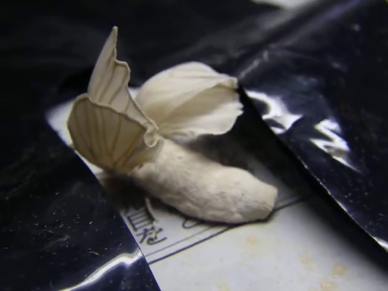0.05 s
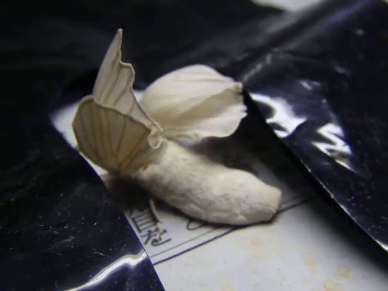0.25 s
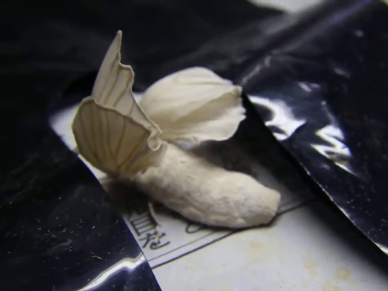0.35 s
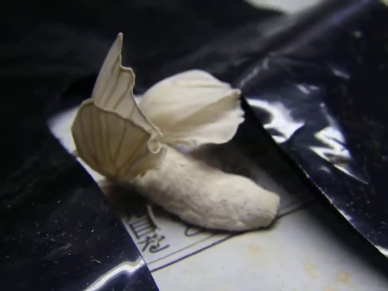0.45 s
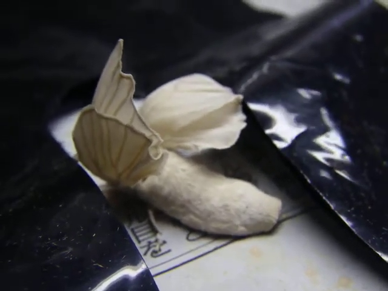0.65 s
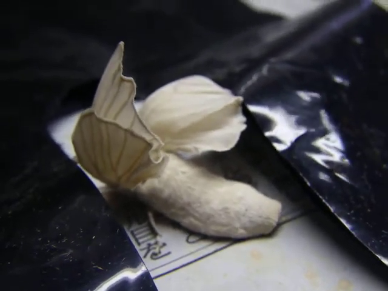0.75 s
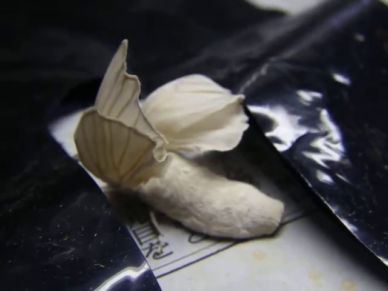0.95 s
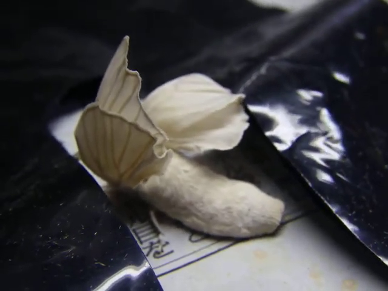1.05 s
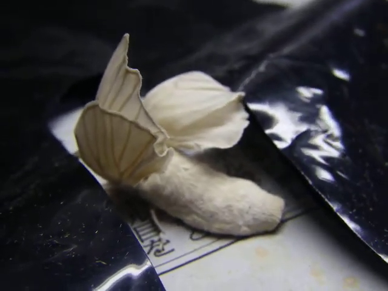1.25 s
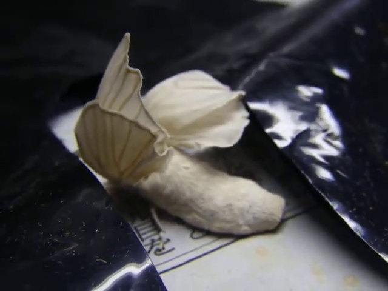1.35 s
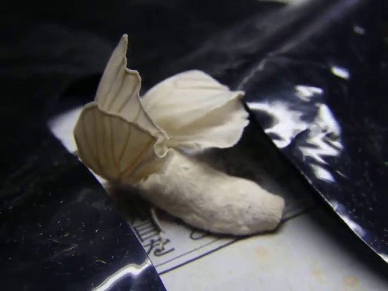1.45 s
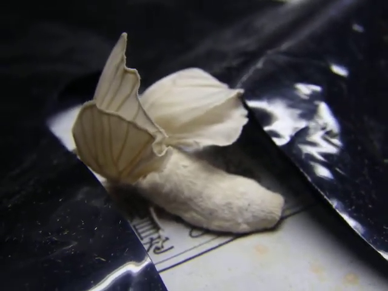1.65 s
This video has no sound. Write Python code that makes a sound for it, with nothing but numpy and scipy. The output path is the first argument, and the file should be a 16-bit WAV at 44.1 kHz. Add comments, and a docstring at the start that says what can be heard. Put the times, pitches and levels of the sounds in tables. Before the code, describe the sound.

A moth tapping lightly on plastic, with one sharp snap, over quiet room noise.

```python
"""Moth on a plastic sheet

A moth shifts about on a sheet of plastic in a quiet room, very near the microphone.
The plastic gives one sharp snap; light taps follow, mostly in pairs, each a tiny tick and a hollow
knock. Every contact excites damped modes of the sheet. The recorder's gain dips after the snap
and lets the room noise swell back."""
import sys
import numpy as np
from scipy import signal
from scipy.fft import rfft, irfft
from scipy.io import wavfile
from scipy.ndimage import uniform_filter1d

SR = 44100
rng = np.random.default_rng(int(sys.argv[2]) if len(sys.argv) > 2 else 0)


def waveform_to_disk(signal):
    """Save audio, clipped to [-1, 1], as 16-bit WAV at the path in sys.argv[1]."""
    frames = np.transpose(np.atleast_2d(signal))
    scaled = np.clip(frames, -1, 1) * 32767
    samples = np.round(scaled).astype(np.int16)
    wavfile.write(sys.argv[1], SR, samples)


N = 74970


def amp(db):
    """Amplitude ratio: a factor of ten for every 20 dB."""
    return 10 ** (np.asarray(db) / 20)


def unit(x):
    """Normalisation to an RMS value of one."""
    return x / np.sqrt(np.mean(x ** 2) + 1e-20)


def add(mix, start_s, sound):
    """Superposition: a sound adds linearly to the mix from its onset."""
    part = mix[round(start_s * SR):][:len(sound)]
    part += sound[:len(part)]


def cut(x, hz, kind, order=2):
    """Butterworth low-pass or high-pass, sloping 6 dB per octave for each order."""
    return signal.sosfilt(signal.butter(order, hz, kind, fs=SR, output="sos"), x)


def ages():
    """Time axis of a transient, in seconds since the contact."""
    return np.arange(4096) / SR


def mode(hz, db, swell, t60, lag=1, bend=0, bend_s=0.0023):
    """Damped oscillator: it swells (later as lag grows), then decays by 60 dB in t60 seconds."""
    t = ages()
    rise = np.sin(np.pi / 2 * np.minimum(t / swell, 1) ** lag) ** 2
    decay = amp(db - 60 * np.maximum(t - swell, 0) / t60)
    cycles = hz * (t - bend * bend_s * (1 - np.exp(-t / bend_s)))  # starts flat by the fraction bend
    return rise * decay * np.sin(2 * np.pi * cycles)


def burst(db, t60):
    """Broadband transient: white noise under an exponential decay."""
    t = ages()
    return amp(db - 60 * t / t60) * rng.standard_normal(len(t))


def room_noise(level_db=-45.5, patchy_db=1.5):
    """Random-phase noise: room sound and microphone hiss, with a slightly fluctuating spectrum."""
    # Spectral density of the background: f/Hz, relative level/dB
    spectrum = [(20, -6.5), (55, -10.5), (100, -8.5), (150, -2), (240, -3.5), (310, -1), (440, -4.5),
                (520, -5), (620, -6.5), (760, -14.5), (930, -5.5), (1170, -16), (1390, -12.5), (1620, -21),
                (2250, -22.5), (2750, -25.5), (5600, -27), (7700, -30), (13700, -31), (15800, -36.5)]
    corner_hz, corner_db = np.transpose(spectrum)
    hz = np.fft.rfftfreq(2048, 1 / SR)
    density_db = np.interp(np.log(hz + 1), np.log(corner_hz + 1), corner_db)
    real, imag, patches = rng.standard_normal((3, N // 512 + 5, len(hz)))
    patches = uniform_filter1d(patches, size=6, axis=0)  # smooth in time
    patches = unit(uniform_filter1d(patches, size=14, axis=1))  # and in frequency
    frames = (real + 1j * imag) * amp(density_db + patchy_db * patches)
    _, noise = signal.istft(frames.T, nperseg=2048, noverlap=1536)
    return amp(level_db) * unit(noise[:N])


def room_resonances():
    """Resonance: narrow bands of noise give the background a hollow colour."""
    # Peaks in the room noise: f/Hz, bandwidth/Hz, level/dB
    peaks = [(415.4, 28, -54), (976.6, 94, -57.5)]
    hz = np.fft.rfftfreq(N, 1 / SR)
    hollow = np.zeros(N)
    for centre_hz, width_hz, db in peaks:
        response = 1 / (1 + (2 * (hz - centre_hz) / width_hz) ** 2)
        hollow += amp(db) * unit(irfft(rfft(rng.standard_normal(N)) * response, N))
    return hollow


def rumble(top_hz=83.3):
    """Amplitude modulation: low-frequency noise swells and sinks unevenly."""
    # Envelope of the rumble: t/s, level/dB
    envelope = [(0, -58), (.07, -45.5), (.14, -53), (.19, -61), (.56, -52), (.68, -63), (.87, -47),
                (.95, -58), (1.3, -71), (1.44, -46.5), (1.52, -61), (1.7, -56)]
    noise = unit(cut(rng.standard_normal(N), top_hz, "low", order=4))
    return noise * amp(np.interp(np.arange(N) / SR, *np.transpose(envelope)))


def tap(knock_db, thump_db, tick_db, tilt_db, pitch, slowness):
    """Impact excitation: a light contact gives a gritty tick, then the sheet knocks and thumps."""
    # Nominal modes of the sheet: f/Hz, relative level/dB, swell/s, T60/s
    knock_modes = [(565, -22, .002, 0.04), (1083, 0.5, .0036, 0.022)]  # hollow ring that builds up after the contact
    thump_modes = [(62.3, -9, 0.0048, 0.08), (318.7, 0, 0.0066, 0.055)]  # slower sway of the whole sheet
    tick_modes = [(1325, -15, 0.00038, 0.019), (1965, -8.5, 0.00047, 0.015), (2875, -10.5, 0.00025, 0.011),
                  (3660, -10.5, 0.00039, 0.013), (4350, -10, 0.00015, 0.011), (5130, -7, 0.00028, 0.014),
                  (5650, -10.5, 0.00046, 0.013), (6800, -9.5, .0002, 0.0045), (7790, -6.5, 0.00029, 0.0057),
                  (9500, -14.5, 0.00017, .004)]  # bright ring of the contact itself
    knock = sum(mode(hz * pitch, db, swell * slowness, t60, bend=0.32)
                for hz, db, swell, t60 in knock_modes)
    thump = sum(mode(*row) for row in thump_modes)
    tick = 0
    for k, (hz, db, swell, t60) in enumerate(tick_modes):
        detune, scatter_db = rng.normal(0, [0.022, 1])  # no two contacts are alike
        mode_db = db + scatter_db + tilt_db * np.log2(hz / 4000)
        tick += (-1) ** k * mode(hz * (1 + detune), mode_db, swell, t60)
    grit = cut(burst(db=-6.5 + tilt_db / 2, t60=0.011), 9100, "low", order=4)
    return amp(knock_db) * knock + amp(thump_db) * thump + amp(tick_db) * (tick + grit)


def snap(gain_db=-2, push_s=0.0026):
    """Impulse response: the plastic cracks, shoves the air and rings; two close modes beat."""
    # Modes rung by the snap: f/Hz, relative level/dB, swell/s, T60/s
    ring_modes = [(85, -25, 0.0038, 0.024), (858, -31.5, 0.0013, 0.044), (1125, -14, .0028, .021),
                  (1570, -24, 0.0014, 0.025), (2000, -16.5, 0.00025, 0.021), (2230, -17.5, 0.000083, 0.015),
                  (2390, -15.5, 0.00033, 0.0085), (2810, -24.5, 0.00021, 0.017),
                  (3570, -21.5, 0.000075, 0.016), (4290, -12.5, 0.00057, 0.0046),
                  (5310, -9, 0.000024, .006), (5560, -5.5, 0.00017, 0.0049), (6370, -6.5, 0.00045, .0014),
                  (7250, -19.5, 0.000065, 0.0047), (9850, -11, 0.00016, 0.0037),
                  (12900, -13.5, 0.00017, 0.0013)]
    twin_mode = (1240, -16, .0028, .023)  # close to the main mode, swinging against it
    lag = 2.06
    ring = sum(mode(*row, lag) for row in ring_modes) - mode(*twin_mode, lag)
    crack = cut(burst(db=-44, t60=0.05), 2000, "high")
    pulse = -np.sin(np.pi * np.minimum(ages() / push_s, 1)) ** 2
    push = amp(-12) * cut(pulse, 41.3, "high", order=1)
    return amp(gain_db) * (ring + crack + push)


def scene():
    """Superposition of the room background, the snap and the moth's taps."""
    # Contacts of the moth: t/s, knock gain/dB, thump gain/dB, tick gain/dB,
    # tick tilt/(dB per octave), knock pitch ratio, knock swell time ratio
    taps = [(0.0142, -61, -44, -39.5, 9, 0.6, 0.85), (.5470, -41, -52, -50, -2, 0.95, 1.2),
            (0.562, -39.5, -39, -51, -2, 0.91, 0.75), (0.761, -41, -37, -51, -9, 0.97, 0.53),
            (0.7746, -52, -38, -42, 1, 1, 1), (.7790, -37.5, -39.5, -48, -10, 0.9, 0.55),
            (0.845, -33.5, -47, -61, -4, 1, 0.69), (.8565, -29, -37, -45, -2, 0.95, 0.77),
            (.8650, -29.5, -35, -42.5, -5, 0.987, 0.84), (1.0086, -29.5, -36, -42.5, -4, 0.94, 0.85),
            (1.0243, -26.5, -35, -39.5, 0, .97, 0.91), (1.0545, -27, -30.5, -34.5, -8, 0.88, 1.1),
            (1.0718, -23, -30.5, -34, -2.5, 0.98, 1.3), (1.0962, -21.5, -33.5, -30.5, -3, 0.99, 0.72),
            (1.1135, -19.5, -31, -31, -4, 1, 0.81), (1.4106, -26.5, -29, -31.5, -7, 1, 0.82),
            (1.4273, -27.5, -33, -34, -6.5, 0.96, 0.6)]
    mix = room_noise() + room_resonances() + rumble()
    add(mix, start_s=0.2105, sound=snap())
    for start_s, *contact in taps:
        add(mix, start_s, tap(*contact))
    return mix[None]


def record(dry):
    """Automatic gain control: loud sounds lower the gain; a notch and a band limit follow."""
    threshold_db, duck_share, release_db_per_s = -27.5, 0.31, 62
    notch_hz, edge_hz = 7410, 15900
    x = dry[0]
    power = signal.lfilter([1 / 200], [1, 1 / 200 - 1], x ** 2)  # 4.5 ms running mean
    power_db = 10 * np.log10(power + 1e-12)
    fall_db = np.arange(N) / SR * release_db_per_s
    held_db = np.maximum.accumulate(power_db + fall_db) - fall_db  # peak hold with a steady release
    excess_db = np.maximum(held_db - threshold_db, 0)
    x = x / amp(duck_share * cut(excess_db, 6.7, "low", order=1))
    x = signal.lfilter(*signal.iirnotch(notch_hz, Q=74, fs=SR), x)
    band_limit = signal.firwin(255, edge_hz, window=("kaiser", 9), fs=SR)
    return signal.oaconvolve(x, band_limit, "same")[None]


dry = scene()
out = record(dry)
waveform_to_disk(out)
```